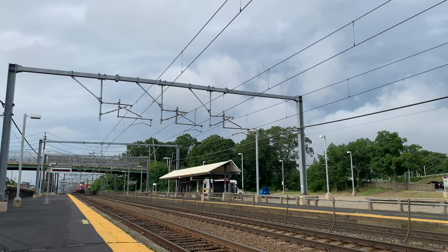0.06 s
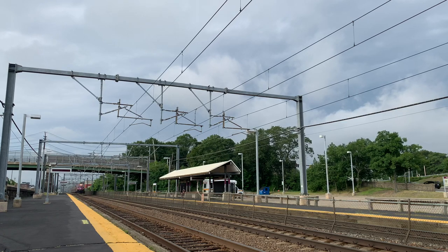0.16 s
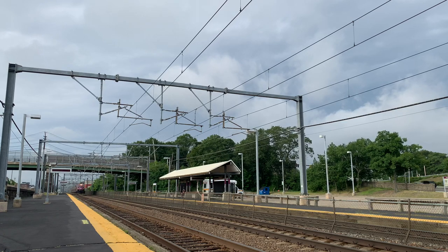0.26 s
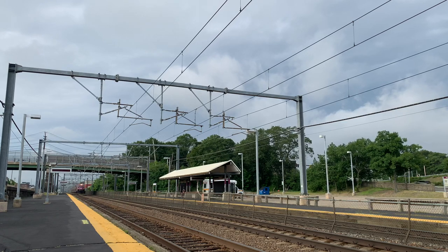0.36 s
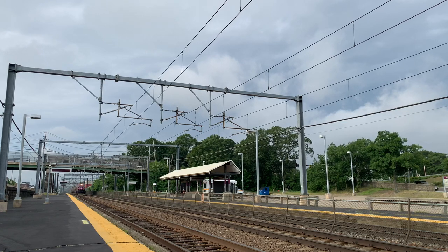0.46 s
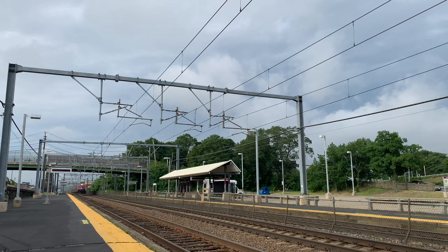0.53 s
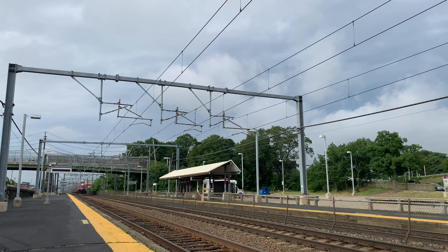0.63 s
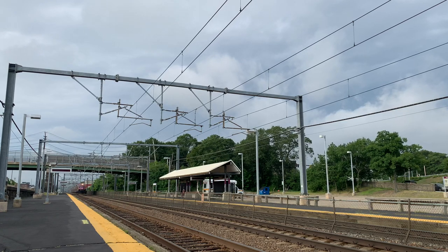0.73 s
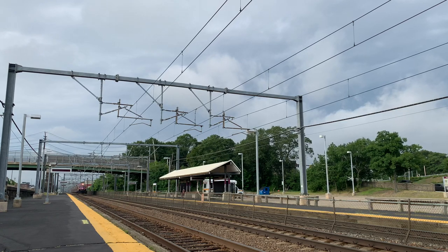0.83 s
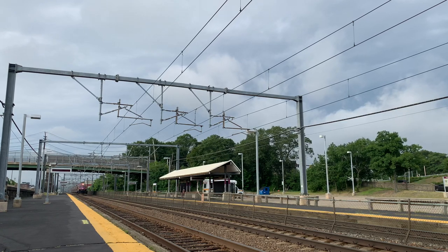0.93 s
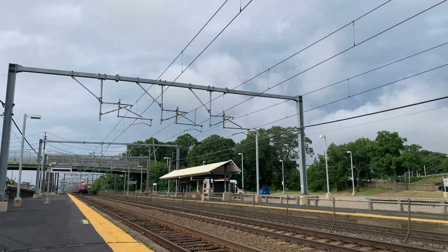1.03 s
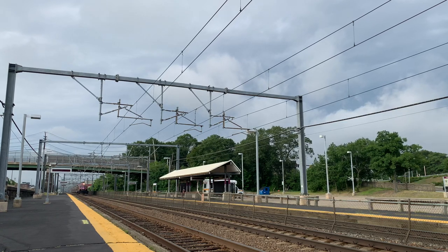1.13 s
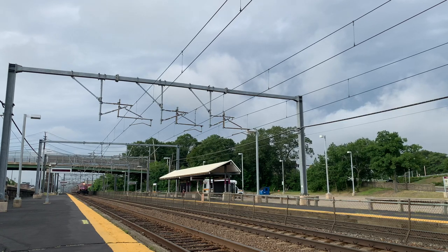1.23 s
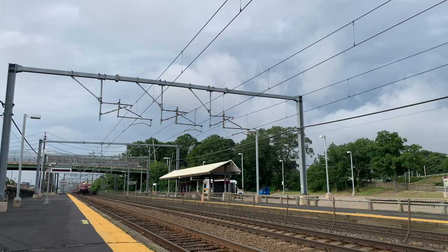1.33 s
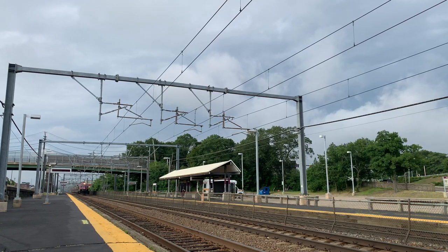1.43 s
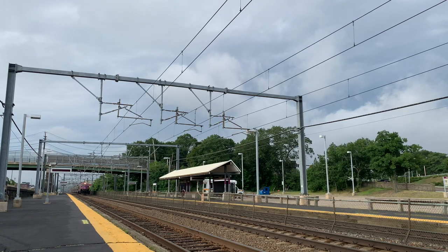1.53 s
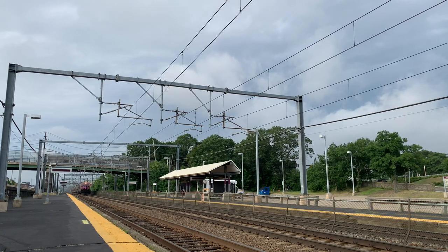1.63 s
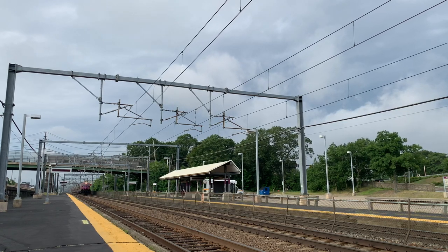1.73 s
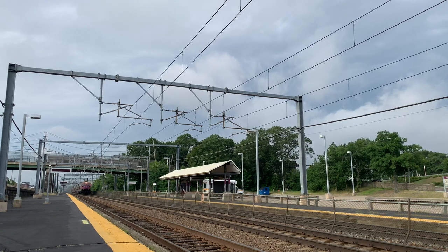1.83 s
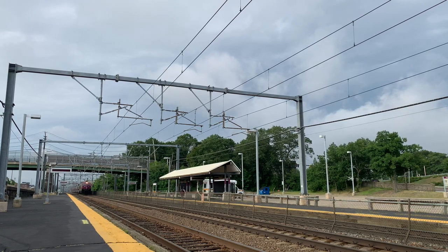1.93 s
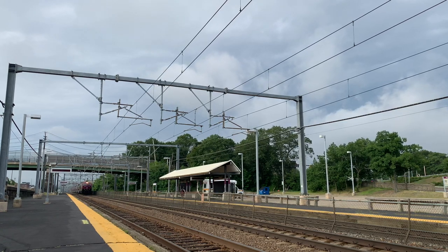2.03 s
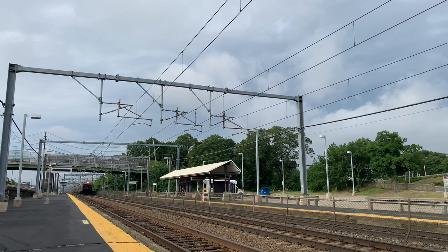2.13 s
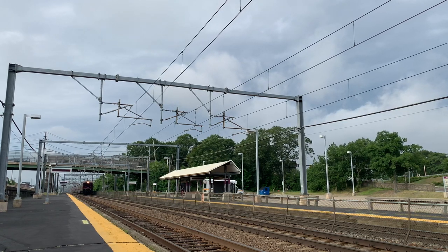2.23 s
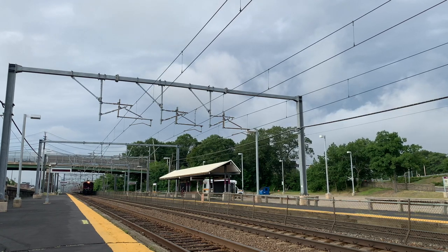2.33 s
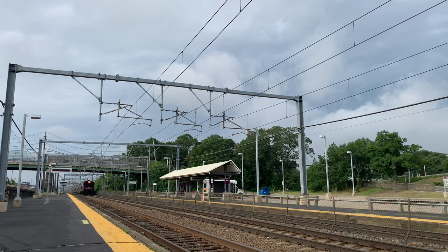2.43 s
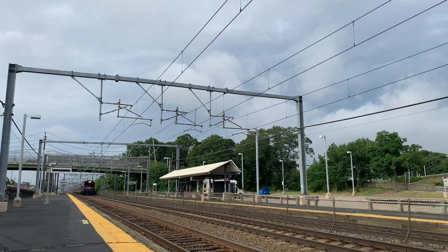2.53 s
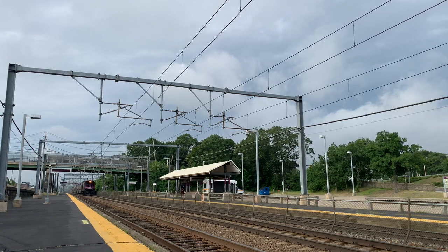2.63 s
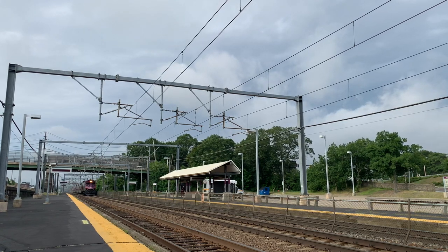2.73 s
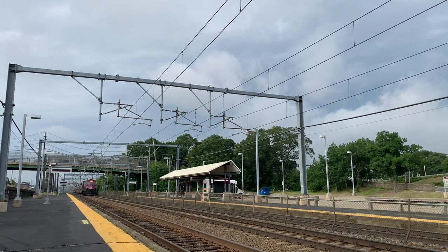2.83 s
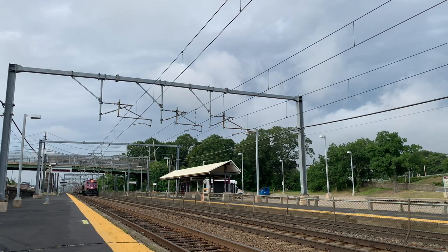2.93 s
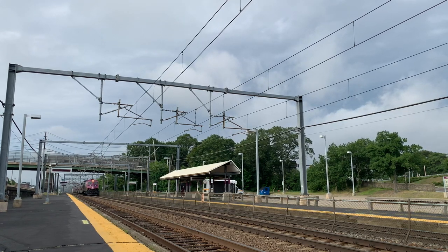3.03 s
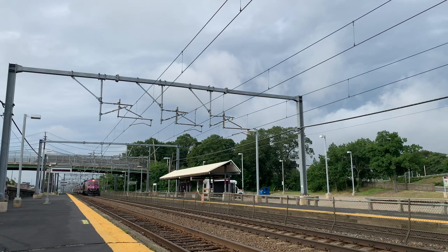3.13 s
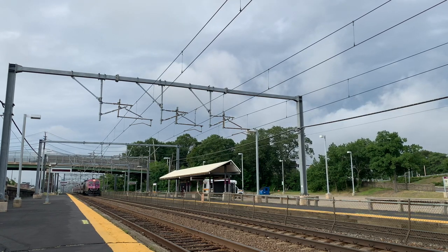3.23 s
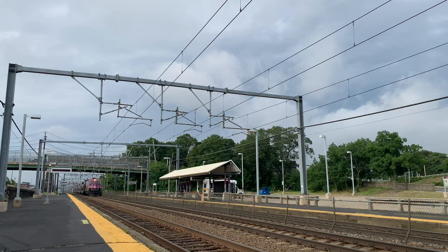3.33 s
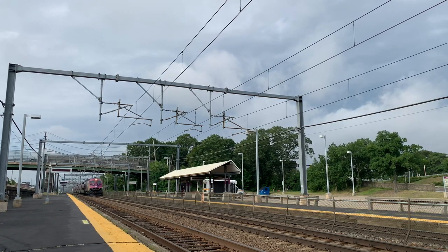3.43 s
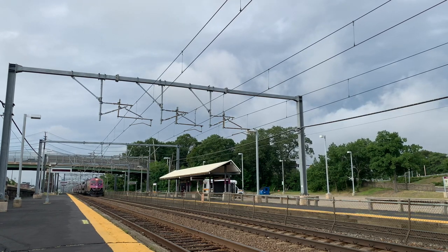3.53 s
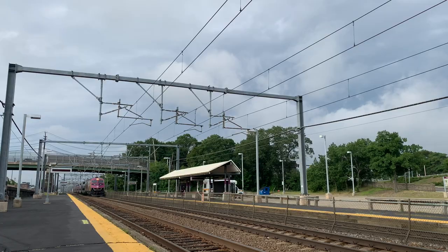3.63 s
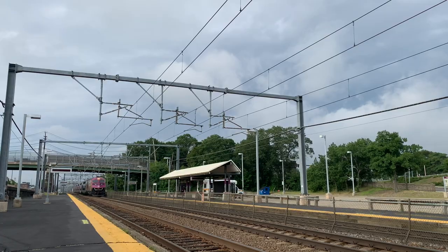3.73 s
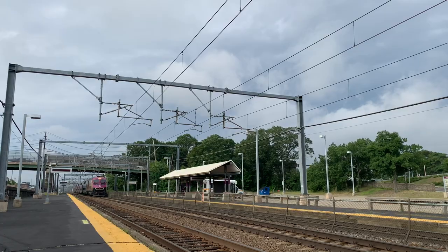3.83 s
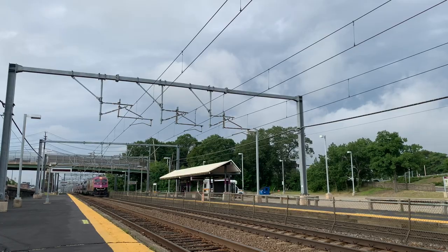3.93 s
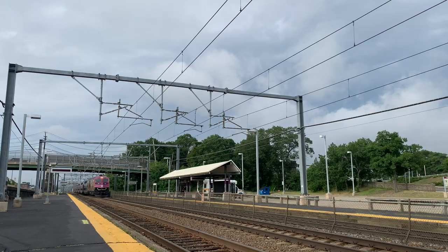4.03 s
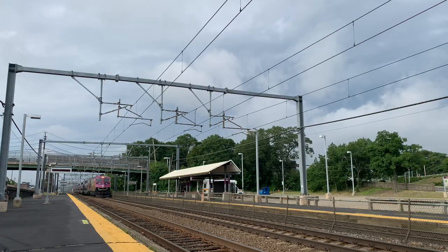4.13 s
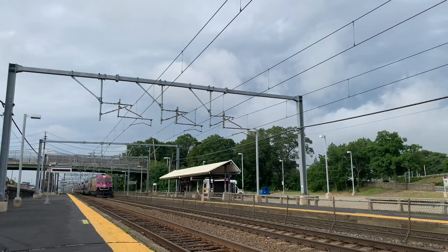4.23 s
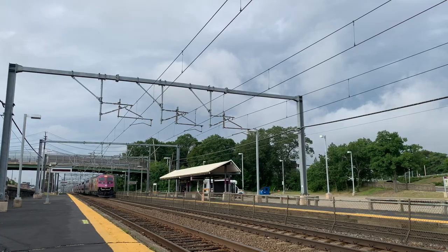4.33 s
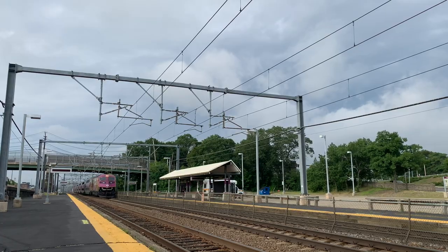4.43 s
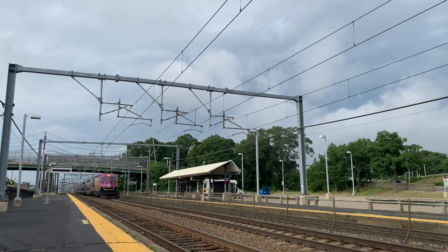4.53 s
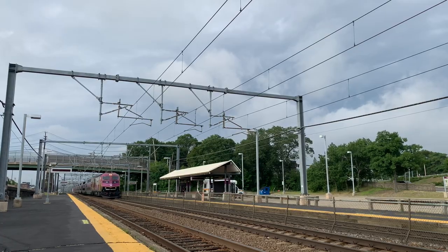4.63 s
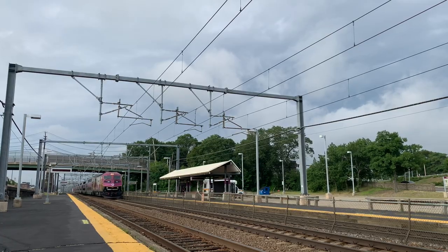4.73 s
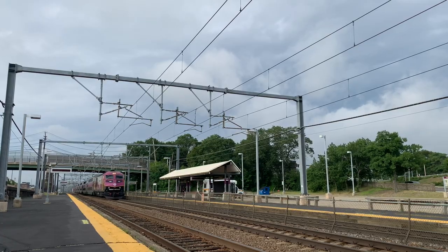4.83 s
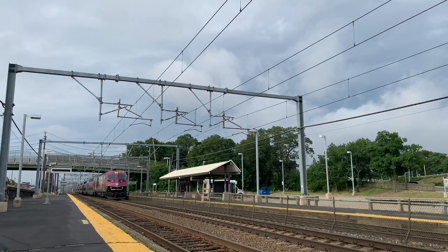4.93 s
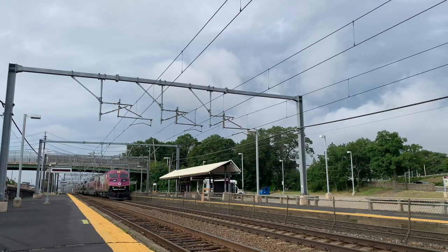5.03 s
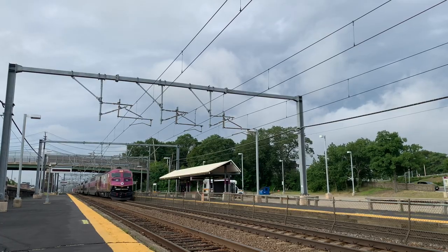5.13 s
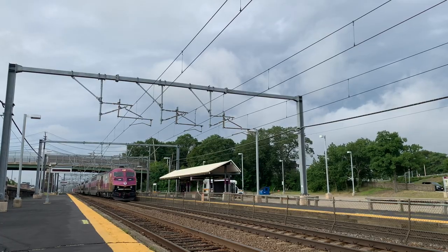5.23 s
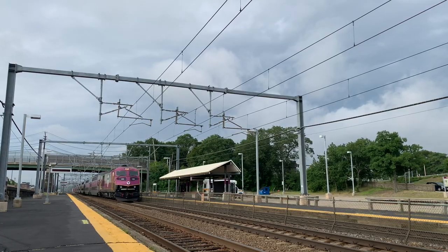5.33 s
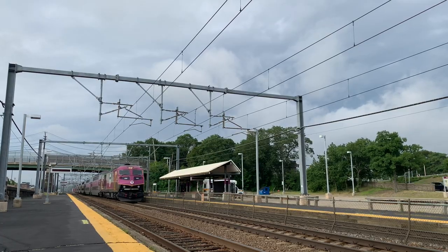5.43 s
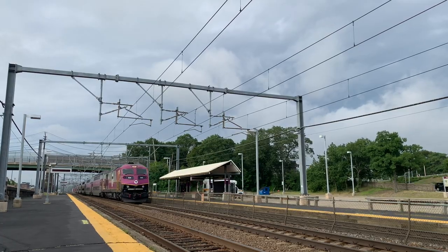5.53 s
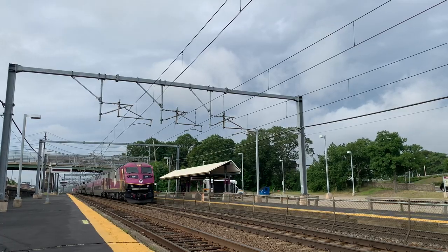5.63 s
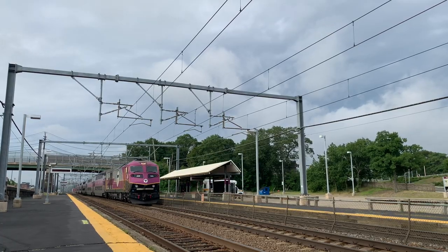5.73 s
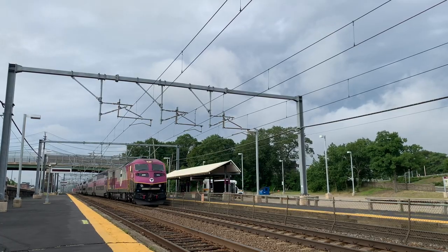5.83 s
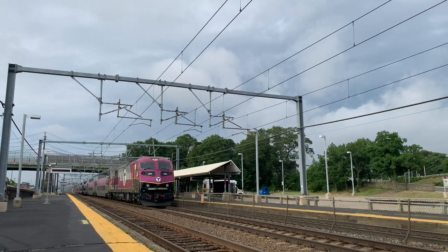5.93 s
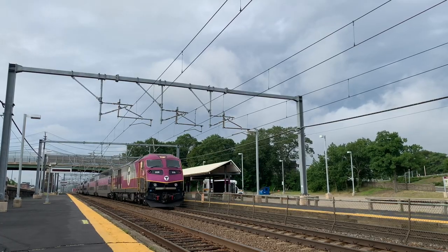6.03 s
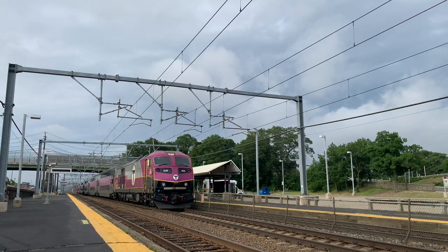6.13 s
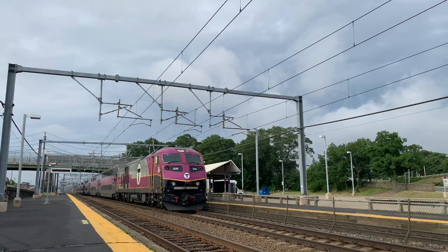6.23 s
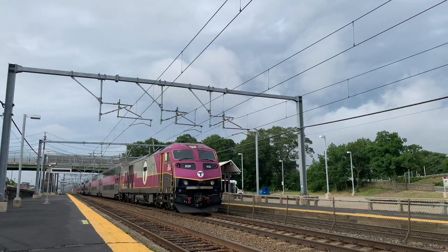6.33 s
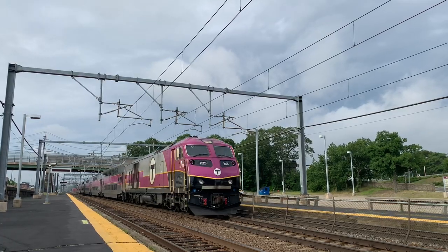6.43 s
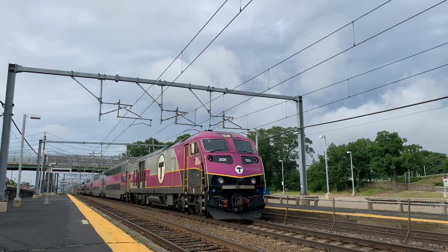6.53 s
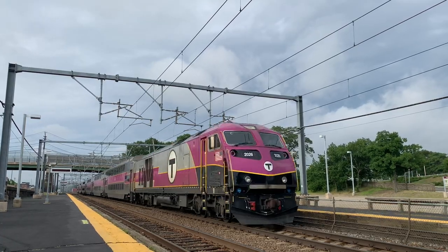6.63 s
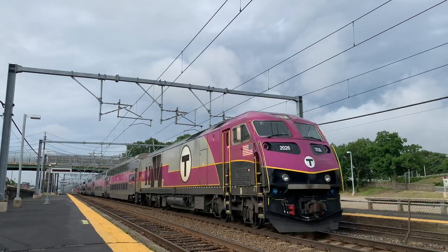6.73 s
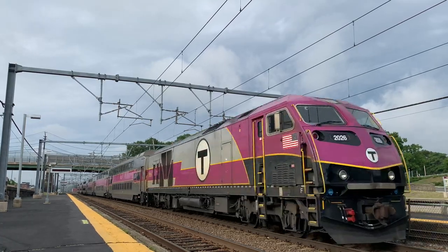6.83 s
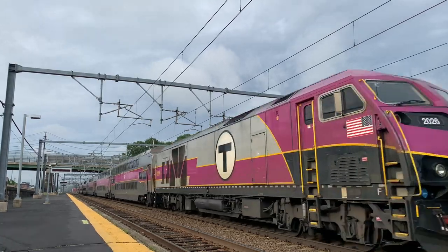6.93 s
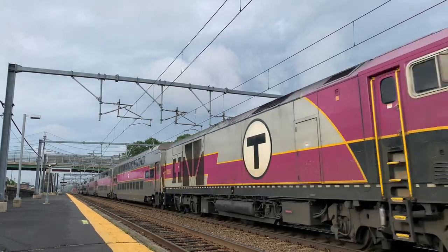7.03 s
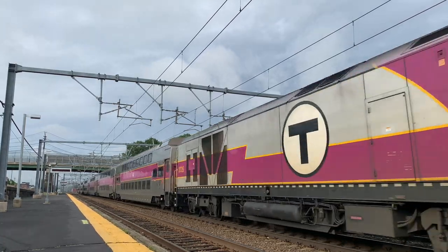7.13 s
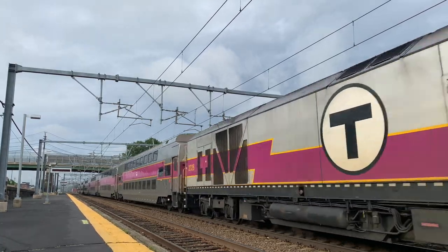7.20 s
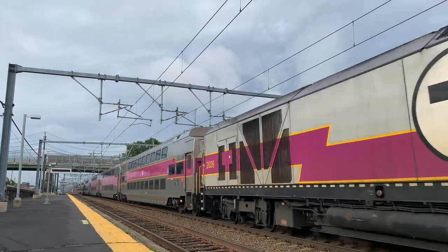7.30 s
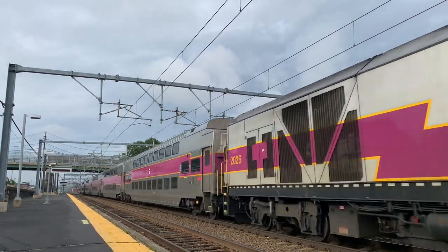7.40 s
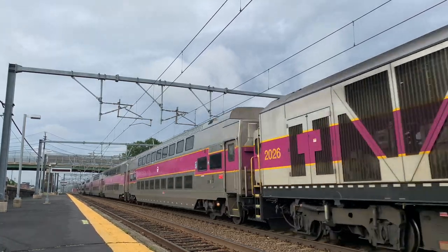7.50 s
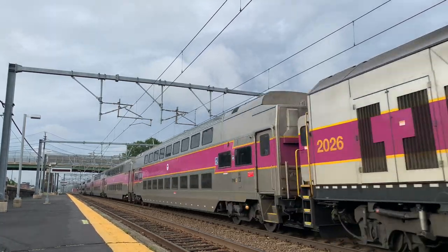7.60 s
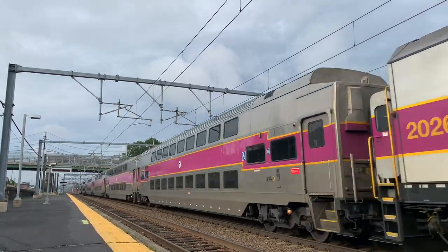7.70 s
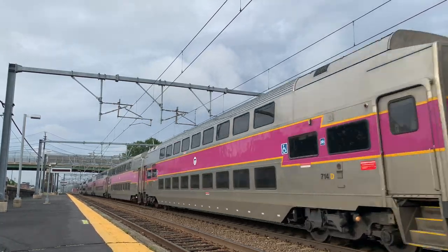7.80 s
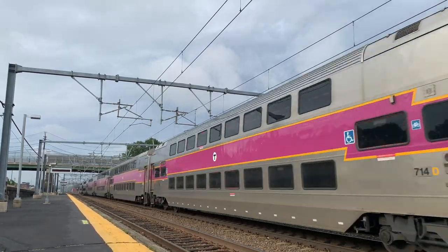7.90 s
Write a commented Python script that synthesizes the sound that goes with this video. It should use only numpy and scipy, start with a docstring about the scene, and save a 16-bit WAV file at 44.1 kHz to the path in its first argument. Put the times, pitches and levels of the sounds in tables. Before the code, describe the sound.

A diesel passenger train approaches from afar and passes close by with a swelling rumble and rail rush, while a camera shutter clicks.

```python
"""A diesel locomotive with its coaches draws near along a platform and passes. At first it is a far throb
of exhaust orders and a drone, while insects hiss in the verge. A camera close by clicks through four
exposures, and wind buffets and dull knocks thump as the roar of fans, wheels and rails swells. The wheels
and rails sing at their resonances. At last the locomotive comes abreast: its fans whine, its flanges
squeak twice and the exhaust sinks in pitch."""
import sys
import numpy as np
from scipy import signal
from scipy.fft import rfft, irfft, next_fast_len
from scipy.io import wavfile
from scipy.ndimage import uniform_filter1d

SR = 44100
rng = np.random.default_rng(int(sys.argv[2]) if len(sys.argv) > 2 else 0)


def transcribe(u):
    """Save the signal u as a 16-bit wav file named by the first command-line argument.

    u: samples, shape (n,) or (channels, n), limited to [-1, 1]; the rate is SR.
    q: integer samples, one column per channel.
    """
    v = np.clip(np.atleast_2d(u).T, -1, 1)
    q = np.round(v * 32767).astype(np.int16)
    wavfile.write(sys.argv[1], SR, q)


N = 351036
SIDES = np.array([[1], [-1]])   # opposite signs for left and right

# crank cycle rate as heard: time_s, rate_hz
CRANK_RATE = [(0, 19.37), (6.9, 19.37), (7.1, 19.1), (7.3, 18.7), (7.5, 18.3), (7.7, 17.75), (7.96, 17.6)]
# firing order, four to a crank cycle, fading and returning in the moving air: time_s, level_db
FIRING_ORDER = [(0.0, -40), (0.6, -21.5), (0.82, -37), (0.9, -19), (0.96, -32), (1.199, -20.5),
                (1.92, -19.5), (2.35, -19.5), (2.47, -37), (2.55, -19), (2.71, -28.5), (2.77, -21.5),
                (2.93, -29), (3.13, -10), (3.27, -12), (3.43, -25), (3.51, -13.5), (4.15, -17), (4.27, -22),
                (5.05, -13.5), (5.57, -22), (5.81, -13), (5.91, -28), (5.99, -12), (6.09, -18.5),
                (6.19, -10.5), (6.76, -8.5), (6.86, -17), (7.1, -5), (7.94, -13.5)]
# fifth order, which beats against the firing order: time_s, level_db
ORDER_5 = [(0.0, -35), (0.76, -45), (0.941, -33), (1.92, -35), (2.12, -27), (2.39, -39), (3.25, -30.5),
           (4.23, -18.5), (4.59, -32), (5.01, -21), (5.35, -31), (5.81, -17.5), (6.43, -14), (6.68, -22),
           (6.919, -10.5), (7.3, -15.5), (7.6, -13.5), (7.941, -24)]
# weaker orders 2, 3, 3.5 and 6: time_s, level_db
ORDER_2 = [(0.0, -58), (0.18, -46), (1.34, -34), (3.512, -34), (6.01, -24.5), (6.62, -47), (6.88, -23),
           (7.94, -32)]
ORDER_3 = [(0.0, -50), (2.22, -29), (2.66, -51), (2.97, -25.5), (3.19, -35), (4.81, -33), (5.01, -46),
           (5.21, -16), (5.37, -25), (6.27, -21), (6.43, -44), (6.559, -23), (6.85, -41), (6.94, -21),
           (7.05, -51), (7.96, -39)]
ORDER_3_5 = [(0.0, -35), (0.4, -31), (0.68, -50), (2.993, -33), (3.4, -28), (3.79, -24), (4.1, -25),
             (4.4, -17.5), (4.948, -30), (5.9, -23.5), (6.8, -20), (7.1, -27), (7.94, -22)]
ORDER_6 = [(0.0, -53), (0.44, -40), (1.0, -43), (2.332, -63), (3.6, -35), (4.148, -25.5), (4.5, -31),
           (5.101, -25), (5.45, -24), (5.8, -24), (6.1, -21.5), (6.45, -47), (6.9, -19), (7.2, -40),
           (7.76, -42), (7.94, -38)]
# exhaust partials: crank_multiple, level_curve, flutter_db, wander_rad
ORDERS = [(2, ORDER_2, 4, 1.3), (3, ORDER_3, 3, 1.2), (3.5, ORDER_3_5, 3, 1),
          (4, FIRING_ORDER, 1.2, .2), (5, ORDER_5, 2, .45), (6, ORDER_6, 3, 1.1)]

def exhaust():
    """Periodic firing radiates multiples of the crank rate, which sink in passing (Doppler shift)."""
    crank_phase = 2 * np.pi * np.cumsum(in_time(CRANK_RATE)[0]) / SR
    out = np.zeros((2, N))
    for order, curve, flutter_db, wander_rad in ORDERS:
        skew_rad = 0.039 + 0.069 * drift(0.45)   # the two microphone ports hear it slightly out of step
        phase = order * crank_phase + rng.uniform(0, 2 * np.pi) + wander_rad * drift(4.04)
        level_db = in_time(curve)[0] + flutter_db * drift(4.8)
        out += np.sqrt(2) * amp(level_db) * np.sin(phase + skew_rad * SIDES)
    return out


# spectrum of the roar before each band is levelled: frequency_hz, density_db
ROAR_SPECTRUM = [(20, -46), (30, -29), (45, -5), (70, 10), (100, 4.5), (145, -1.5), (220, -8.5),
                 (630, -5.5), (850, -19), (1340, -26), (1740, -29), (2400, -25), (3120, -34), (4460, -36.5),
                 (6000, -43), (6800, -40), (7500, -40), (8500, -37), (10000, -38), (13000, -56),
                 (15500, -87)]
# crossovers between its twelve bands: frequency_hz
ROAR_EDGES = [140, 250, 350, 500, 680, 900, 1200, 1600, 2100, 3200, 7200]
# swell of the roar as the train nears: time_s, middle_db, bass_db, treble_db
ROAR_SWELL = [(0.0, -40, -37, -61.5), (0.22, -46, -43.5, -58.5), (0.64, -40, -43.5, -62.5),
              (1.11, -42.5, -39, -61), (1.42, -37, -41, -56.5), (1.75, -37, -37.5, -61.5),
              (2.59, -36, -36.5, -57), (2.93, -37, -37.5, -56.5), (3.23, -35, -34.5, -54),
              (3.61, -31.5, -35.5, -53), (3.9, -34, -34.5, -48.5), (4.26, -32, -36, -53),
              (4.66, -32, -35, -52.5), (4.99, -34, -32.5, -50.5), (5.23, -31.5, -35, -49),
              (5.79, -29.5, -29, -44), (6.27, -26.5, -25.5, -43), (6.61, -23.5, -26.5, -40),
              (7.09, -22.5, -22, -34.5), (7.47, -18, -24, -34), (7.96, -20.5, -22.5, -36.5)]
# upper bass: time_s, level_db
UPPER_BASS_SWELL = [(0.0, -42.5), (0.8, -47), (1.06, -41), (1.37, -44), (2.99, -43), (3.35, -36.5),
                    (4.06, -37), (4.3, -28.5), (4.5, -37), (4.9, -32), (5.28, -35), (5.56, -29),
                    (7.32, -27.5), (7.96, -32.5)]
# low middle, the boom of wheels and body: time_s, level_db
BOOM_SWELL = [(0.0, -46.5), (0.55, -43), (0.93, -42.5), (1.13, -43.5), (1.75, -39.5), (2.97, -37),
              (3.3, -34.5), (3.57, -31), (3.94, -33.5), (4.61, -33), (4.96, -32), (5.3, -32.5),
              (5.96, -27.5), (6.25, -29), (6.28, -22.5), (6.5, -24.5), (6.58, -27), (6.76, -22.5),
              (6.92, -21), (7.05, -21.5), (7.12, -22.5), (7.3, -18.5), (7.45, -19), (7.6, -17),
              (7.76, -18.5), (7.82, -26), (7.96, -25)]
# upper middle, the rush of fans and rails: time_s, level_db
RUSH_SWELL = [(0.0, -54.5), (0.73, -55.5), (1.53, -53), (2.95, -49.5), (3.59, -42.5), (4.43, -47.5),
              (5.28, -43.5), (5.96, -39.5), (6.52, -36), (6.89, -31), (7.25, -32.5), (7.36, -24.5),
              (7.47, -25), (7.62, -26.5), (7.74, -31), (7.96, -31)]
# top, the hiss of air and brakes: time_s, level_db
HISS_SWELL = [(0, -78), (1.2, -74), (2.7, -62.5), (4.0, -56.5), (5.4, -50.5), (6.3, -45.5), (6.7, -42),
              (7.15, -38), (7.5, -41), (7.96, -44)]
# bands, low to high: offset_db, extra_swell_ratio, flicker_db
ROAR_BANDS = [(4.5, -0.18, 1), (2.5, 0.05, 2.5), (-4.5, 0.32, 3), (-5, 0.018, 1), (-6, 0.24, 2.5),
              (-9.5, -0.019, 2), (-12, 0.13, 3), (-6.5, -0.069, 3), (-6.5, -0.0016, 1.5), (-4.5, 0.17, 2.5),
              (-1, 0.02, 0.82), (3, 0.032, 0.9)]
ABREAST_DB = -20   # reference level of the roar with the locomotive abreast

def roar():
    """Broadband noise of fans, wheels and rails: each band swells and flickers in the moving air."""
    gust_db = 0.15 * drift(14.0)
    bands = noise_bands(ROAR_SPECTRUM, ROAR_EDGES)
    middle, bass, treble = in_time(ROAR_SWELL)
    upper_bass, boom = in_time(UPPER_BASS_SWELL)[0], in_time(BOOM_SWELL)[0]
    rush, hiss = in_time(RUSH_SWELL)[0], in_time(HISS_SWELL)[0]
    curves = [bass, upper_bass, bass, (bass + boom) / 2, boom, boom, (boom + middle) / 2,
              rush, rush, rush, treble, hiss]
    out = np.zeros((2, N))
    for band, curve, (offset_db, extra_swell, flicker_db) in zip(bands, curves, ROAR_BANDS):
        swell_db = curve + offset_db + extra_swell * (curve - ABREAST_DB)
        out += band * amp(swell_db + gust_db + flicker_db * drift(14.8))
    return out


def nearness_db():
    """Level rises as distance falls: the roar's middle relative to its level abreast."""
    return in_time(ROAR_SWELL)[0] - ABREAST_DB


# modes of wheels and rails: pitch_hz, bandwidth_hz, level_db
WHEEL_MODES = [(458, 25, 1), (632, 15, -4.5), (795.6, 24, 0.5), (1070, 33, -6), (1600, 50, -12.5),
               (1956, 28, -7), (2180, 38, -9), (2425, 42, -4), (2666, 17, -9.5), (3420, 270, -20),
               (4380, 38, -19)]
# gain of the wheels' singing over the whole approach, easing as the train passes: time_s, gain_db
SINGING_GAIN = [(0, 6), (3.5, -2.5), (5, 3.5), (6.4, 1.5), (6.8, 3.5), (7.25, 2.5), (7.42, 1), (7.6, -1.5),
                (7.96, -1)]

def wheel_singing():
    """Forced resonance: noise drives narrow modes of wheels and rails, each flickering on its own."""
    noise = stereo_noise(side_gain=1.14)
    modes = sum(amp(db + 3.5 * drift(14.5)) * rms_one(resonance(noise, hz, width_hz))
                for hz, width_hz, db in WHEEL_MODES)
    return modes * amp(-31.5 + 1.59 * nearness_db() + in_time(SINGING_GAIN)[0])


# drone that carries far ahead of the train: pitch_hz, bandwidth_hz, level_db
DRONE_BANDS = [(967, 72, 4.5)]

def drone():
    """Narrow-band noise has a pitch: two passes through one resonance leave a drone."""
    noise = stereo_noise(side_gain=1.51)
    out = np.zeros((2, N))
    for hz, width_hz, db in DRONE_BANDS:
        band = resonance(resonance(noise, hz, width_hz), hz, width_hz)
        out += amp(db + 3 * drift(6.3)) * rms_one(band)
    return out * amp(-31.5 + 0.89 * nearness_db() + 1.3 * drift(2.0))


# course of a thin tone: time_s, pitch_hz, level_db, waver_hz
THIN_TONE_PATH = [(0, 1328, -59, 4.4), (0.6, 1320, -55.5, 3), (1.5, 1312, -55.5, 3.2),
                  (2.5, 1303, -52.5, 2.2), (3.1, 1298, -59, 3.4), (3.6, 1293, -50.5, 3),
                  (4.2, 1288, -50, 2.6), (4.8, 1283, -51, 2.4), (5.3, 1280, -54, 4.7), (6.0, 1275, -44, 10),
                  (6.3, 1290, -63, 14), (6.7, 1300, -37, 19), (7.0, 1310, -29.5, 20), (7.5, 1310, -43, 22),
                  (7.7, 1270, -33, 24), (7.96, 1210, -37, 23)]

def thin_tone():
    """Random frequency modulation: a sagging tone grows louder and rougher as the locomotive nears."""
    hz, level_db, waver_hz = in_time(THIN_TONE_PATH)
    phase = 2 * np.pi * np.cumsum(hz + waver_hz * drift(21.4)) / SR
    return np.sqrt(2) * amp(level_db + 5.5 + 4.0 * drift(5.2)) * np.sin(phase + 1.12 * SIDES)


# whine of the cooling fans: time_s, pitch_hz, level_db
FAN_TONE = [(6.55, 2435, -48), (6.68, 2435, -40), (6.9, 2430, -43), (7.25, 2425, -42), (7.38, 2420, -39),
            (7.43, 2415, -31), (7.49, 2410, -40), (7.55, 2360, -37), (7.6, 2345, -46), (7.7, 2340, -50)]

def fan_whine(waver_hz=22, fade_s=0.12):
    """Directivity: the wavering tone is heard only while the fans face the platform."""
    hz, level_db = in_time(FAN_TONE)
    t = np.arange(N) / SR
    facing = np.clip(np.minimum(t - FAN_TONE[0][0], FAN_TONE[-1][0] - t) / fade_s, 0, 1)
    gain = facing * amp(level_db + 2.5 * drift(24.1))
    phase = 2 * np.pi * np.cumsum(hz + waver_hz * drift(29.4)) / SR
    return np.sqrt(2) * gain * np.sin(phase)


# squeaks of the wheel flanges: start_s, end_s, from_hz, to_hz, level_db
FLANGE_GLIDES = [(7.055, 7.095, 9150, 9050, -37), (7.13, 7.2, 8850, 8800, -35)]

def flange_squeals():
    """Friction tones: the flanges give brief, high, falling squeaks."""
    out = np.zeros(N)
    for glide in FLANGE_GLIDES:
        add_glide(out, *glide)
    return out


# four exposures: delay_s, gain_db
EXPOSURE_DELAYS = [(0, 1.5), (1.0676, -0.5), (3.684, -0.5), (5.437, -1.5)]
# contacts in one shutter cycle: start_s, level_db, thud_gain_db, tick_gain_db, t60_s
SHUTTER_CONTACTS = [(0.2595, -19.5, -2, -29, 0.0085), (0.268, -34, -1, -13, 0.029),
                    (0.281, -33, 2, -7, 0.023), (0.2874, -47, 5, -7, 0.02), (0.2964, -44, 8, -12, 0.022),
                    (0.331, -35, 6.5, 9.5, 0.026), (0.38, -20.5, -11, -26, 0.028),
                    (0.392, -29, -3, -3, 0.032), (0.402, -34, -1, -7, 0.056)]
# lone faint clicks of the camera: start_s, level_db
LONE_CLICKS = [(2.558, -31), (2.845, -33), (3.159, -34)]
# gears running through the cycle: start_s, end_s, level_db
GEAR_RATTLE = (.24, .45, -43.5)
# small motor that cocks the shutter: start_s, end_s, from_hz, to_hz, level_db
MOTOR_GLIDES = [(.24, .253, 5200, 5500, -52), (.358, .378, 6250, 6350, -54), (.406, .44, 7150, 6550, -50),
                (.41, .442, 2250, 2150, -43), (.4, .416, 3550, 3500, -39)]
# body modes, grouped as thud, clack and tick: pitch_hz, gain_db, bandwidth_hz
CAMERA_MODES = [
    [(1410, 5, 82), (1760, -8.5, 720)],
    [(2180, -13, 86), (2730, -2.5, 220), (3580, -2, 110), (3000, -4, 1500)],
    [(4700, -3, 520), (5650, 0.5, 450), (8100, -14, 2600), (10400, -8, 1400)],
]

def camera(attack_s=0.00053):
    """Impact excitation: shutter contacts and gears ring the small body, and a motor whirs."""
    drive, motor = np.zeros((3, N)), np.zeros(N)
    t = np.arange(round(.08 * SR)) / SR
    contacts = [(start_s + delay_s, db + shot_db, *rest)
                for delay_s, shot_db in EXPOSURE_DELAYS for start_s, db, *rest in SHUTTER_CONTACTS]
    contacts += [(start_s, db, -9, -3, .015) for start_s, db in LONE_CLICKS]
    for start_s, db, thud_db, tick_db, t60_s in contacts:
        i = round(start_s * SR)
        burst = rng.standard_normal(len(t)) * amp(db - 60 * t / t60_s) * np.minimum(t / attack_s, 1)
        drive[:, i:i + len(t)] += amp([[thud_db + 13.0], [7], [tick_db + 7.5]]) * burst
    gear_start_s, gear_end_s, gear_db = GEAR_RATTLE
    for delay_s, shot_db in EXPOSURE_DELAYS:
        i, k = round((gear_start_s + delay_s) * SR), round((gear_end_s + delay_s) * SR)
        rattle = signal.windows.tukey(k - i, .3) * rng.laplace(size=(3, k - i))
        drive[:, i:k] += amp(gear_db + shot_db) * rattle
        for start_s, end_s, from_hz, to_hz, db in MOTOR_GLIDES:
            add_glide(motor, start_s + delay_s, end_s + delay_s, from_hz, to_hz, db + shot_db)
    body = sum(amp(db) * resonance(force + 1e-18, hz, width_hz)
               for force, modes in zip(drive, CAMERA_MODES) for hz, db, width_hz in modes)
    muffled = signal.sosfilt(signal.butter(8, 11200, fs=SR, output="sos"), motor + body)   # by the case
    return np.array([muffled, np.roll(muffled, shift=3)]) * amp(-1.1 * SIDES)


# wind buffets and dull knocks: start_s, level_db, decay_s, centre_hz
LOW_THUMPS = [(0.785, -49, 0.0034, 194), (0.855, -23, 0.0045, 290), (0.88, -20, 0.0052, 228),
              (0.9, -21, 0.0049, 430), (0.908, -13.5, 0.0035, 300), (0.918, -20.5, 0.0051, 270),
              (0.926, -16, 0.003, 146), (0.931, -25, 0.0022, 537), (1.038, -24.5, 0.01, 256),
              (1.263, -25, 0.0032, 147), (2.516, -19.5, 0.0083, 290), (2.647, -21, 0.011, 151),
              (2.851, -22.5, 0.0041, 275), (3.518, -23, 0.0081, 152), (4.101, -12, 0.0064, 290),
              (4.148, -14, 0.005, 147), (4.214, -7, 0.0044, 157), (4.237, -17, 0.025, 196),
              (4.295, -32, 0.0039, 224), (5.1, -10, 0.0044, 144), (5.621, -15.5, 0.0052, 194),
              (5.84, -8, 0.0022, 159), (6.269, -4.5, 0.0035, 377), (6.295, -14, 0.0033, 207),
              (6.305, -10.5, 0.0094, 386), (7.042, -6.5, 0.0029, 520), (7.171, -9, 0.0034, 614)]

def thumps(push_hz=90):
    """Damped transients: each short, low thump is a lump of band-limited noise with a push of air."""
    out, size = np.zeros((2, N)), round(.08 * SR)
    t = np.arange(size) / SR
    for start_s, db, decay_s, centre_hz in LOW_THUMPS:
        age = t / decay_s
        noise = rng.standard_normal((3, 2 * size))
        band = signal.butter(3, [0.695 * centre_hz, 1.41 * centre_hz], "band", fs=SR, output="sos")
        dull = signal.sosfilt(band, noise[0] + 0.26 * noise[1:])   # mostly common to both ports
        lump = dull[:, size:] * age ** 0.81 * np.exp(1 - age)
        push = np.sin(2 * np.pi * push_hz * t) * np.exp(-0.5 * age)
        i = round(start_s * SR)
        out[:, i:i + size] += amp(db + 0.5) * (lump / np.abs(lump).max() + push)
    return out


# spectrum of the insect chorus: frequency_hz, density_db
INSECT_SPECTRUM = [(4000, -80), (7000, -53), (8500, -33), (9300, -17), (10500, -5), (12000, -0.5),
                   (13000, 2.5), (14000, -5), (15000, -7), (15300, -14), (15700, -16)]
# its swelling and sinking: time_s, level_db
INSECT_SWELL = [(0.0, -49), (0.22, -52.5), (0.8, -46), (0.91, -50), (1.64, -50.5), (1.84, -48), (2.79, -46),
                (2.88, -50), (3.08, -42), (3.19, -48.5), (4.01, -43.5), (4.23, -46.5), (4.77, -44.5),
                (4.92, -49), (4.99, -42.5), (5.23, -46.5), (6.27, -43.5), (6.36, -49), (6.63, -42.5),
                (7.83, -46.5), (7.92, -49), (7.96, -45)]

def insects():
    """Incoherent sources merge into noise: the chorus in the grass is a high, gently pulsing hiss."""
    hiss, = noise_bands(INSECT_SPECTRUM, [])
    return hiss * amp(in_time(INSECT_SWELL)[0] + 3.5 + 0.7 * drift(10.0))


# side noise relative to mid noise: frequency_hz, gain_db
SIDE_GAIN = [(30, -2), (60, -4), (110, -1.5), (200, -7.5), (380, -7), (700, 0), (1200, 2), (2400, -0.5),
             (4400, -2.5), (8000, -11)]
# mid noise a quarter cycle out of step, positive when the right leads: frequency_hz, share_ratio
QUADRATURE = [(400, 0.23), (650, 0.33), (1000, 0.23), (1900, .4), (2600, -0.76), (3600, -1), (5000, 0.99),
              (6200, 0.52), (7400, -0.25)]
# balance of the noise: frequency_hz, left_minus_right_db
NOISE_BALANCE = [(60, -3), (130, -2), (290, 0.5), (640, 0.5), (1410, -0.5), (3100, -1.5), (6820, -3),
                 (15000, 2)]

def noise_bands(spectrum, edges_hz):
    """Partial coherence: coloured mid and side noise, in overlapping bands each of mid rms 1."""
    size = next_fast_len(N)
    hz = np.maximum(np.arange(size // 2 + 1) * SR / size, 1)
    mid, side = rfft(rng.standard_normal((2, size))) * amp(at_hz(spectrum, hz))
    side = side * amp(at_hz(SIDE_GAIN, hz)) - 1j * at_hz(QUADRATURE, hz) * mid
    pair = (mid + SIDES * side) * amp(SIDES * at_hz(NOISE_BALANCE, hz) / 2)
    above = [1] + [np.clip(.5 + 2 * np.log2(hz / edge), 0, 1) for edge in edges_hz] + [0]
    bands = [irfft(pair * (lower - upper), size)[:, :N] for lower, upper in zip(above, above[1:])]
    return [band / np.std(band.mean(axis=0)) for band in bands]


def stereo_noise(side_gain):
    """Superposition of in-phase and antiphase white noise."""
    mid, side = rng.standard_normal((2, N))
    return mid + side_gain * side * SIDES


def add_glide(out, start_s, end_s, from_hz, to_hz, db):
    """Mix in a short linear sweep with random frequency modulation."""
    i, size = round(start_s * SR), round((end_s - start_s) * SR)
    waver_hz = 900 * uniform_filter1d(rng.standard_normal(size), size=60)
    phase = 2 * np.pi * np.cumsum(np.linspace(from_hz, to_hz, size) + waver_hz) / SR
    out[i:i + size] += amp(db) * np.hanning(size) ** .5 * np.sin(phase)


def resonance(x, hz, width_hz):
    """Damped resonator: a two-pole band-pass of peak gain 1."""
    r = np.exp(-np.pi * width_hz / SR)
    feedback = [1, -2 * r * np.cos(2 * np.pi * hz / SR), r * r]
    return signal.lfilter(np.array([1, 0, -1]) * (1 - r * r) / 2, feedback, x)


def drift(rate_hz, step=40):
    """Slow random fluctuation: low-passed noise of rms 1."""
    r = np.exp(-2 * np.pi * step * rate_hz / SR)
    slow = signal.lfilter([1], [1, -2 * r, r * r], rng.standard_normal(N // step + 2002))[2000:]
    return np.interp(np.arange(N) / step, np.arange(len(slow)), rms_one(slow))


def in_time(rows):
    """Interpolate each column of a time curve to one value a sample."""
    time_s, *columns = np.transpose(rows)
    return [np.interp(np.arange(N) / SR, time_s, column) for column in columns]


def at_hz(spectrum, hz):
    """Interpolate a spectrum on a logarithmic frequency axis."""
    points_hz, values = np.transpose(spectrum)
    return np.interp(np.log(hz), np.log(points_hz), values)


def amp(db):
    """Decibels to amplitude ratio."""
    return 10 ** (np.asarray(db) / 20)


def rms_one(x):
    """Scale to rms 1."""
    return x / np.sqrt(np.mean(x ** 2) + 1e-20)


# sway of the engine between the sides: time_s, left_minus_right_db
ENGINE_BALANCE = [(0.0, 4), (0.4, 1.5), (2.91, 1.5), (3.97, -4.5), (4.53, 2.5), (5.01, -5.5), (5.73, 1),
                  (6.41, -2), (7.94, -1)]

def scene():
    """Superposition of all sources; a changing level difference sways the engine from side to side."""
    engine = (exhaust() + fan_whine()) * amp(in_time(ENGINE_BALANCE)[0] * SIDES / 2)
    train = engine + roar() + wheel_singing() + drone() + thin_tone() + flange_squeals()
    return train + insects() + thumps() + camera()


def record(dry, treble_hz=7400, lag_s=1 / 4625):
    """Microphone response: near-mono treble that reaches the left late, band limits, soft saturation."""
    size = next_fast_len(2 * N)
    hz = np.arange(size // 2 + 1) * SR / size
    spectrum = rfft(np.pad(dry, [(0, 0), (0, size - N)], "reflect"))
    mono_share = .8 * np.clip((hz - treble_hz) / 1200, 0, 1)
    spectrum = (1 - mono_share) * spectrum + mono_share * spectrum.mean(axis=0)
    lag_cycles = (hz * lag_s - 2) * np.clip(1 + (hz - treble_hz) / 1500, 0, 1)   # fades in below treble
    ports = irfft(spectrum * np.exp(-1j * np.pi * SIDES * lag_cycles), size)[:, :N]
    ports = signal.sosfilt(signal.butter(2, 30, "high", fs=SR, output="sos"), ports)
    rounded = ports / (1 + np.abs(ports / 1.03) ** 5) ** (1 / 5)
    top_cut = signal.ellip(12, .5, 80, 15700, fs=SR, output="sos")
    return np.clip(signal.sosfilt(top_cut, rounded), -1, 1)


dry = scene()
out = record(dry)
transcribe(out)
```